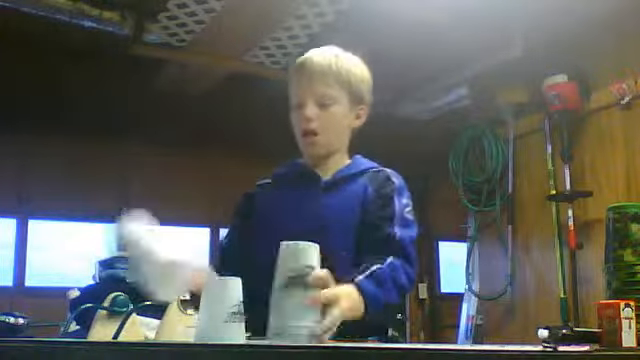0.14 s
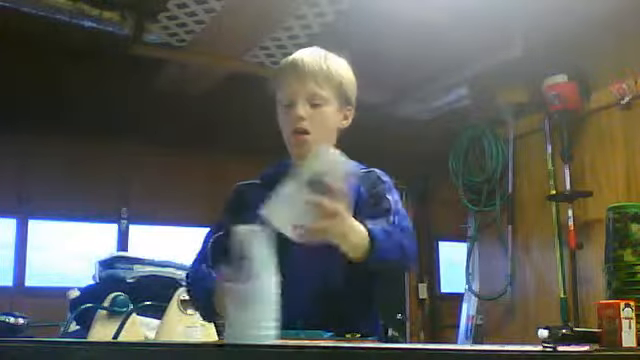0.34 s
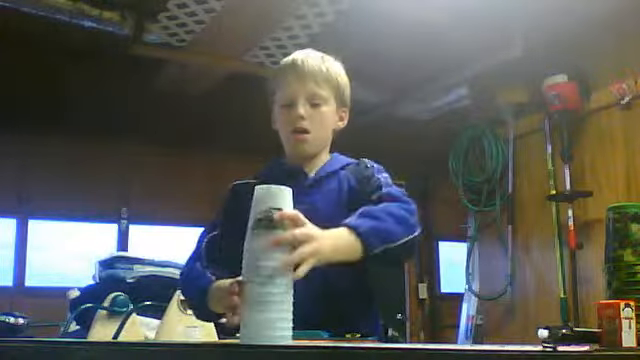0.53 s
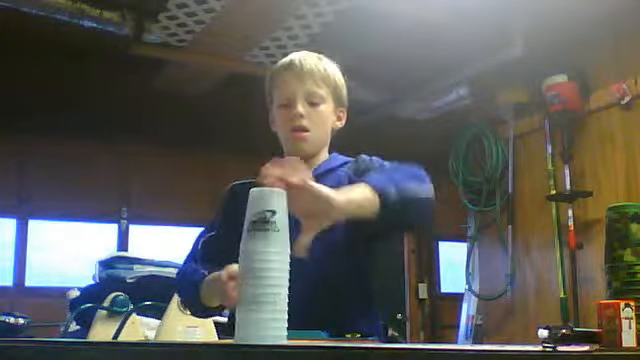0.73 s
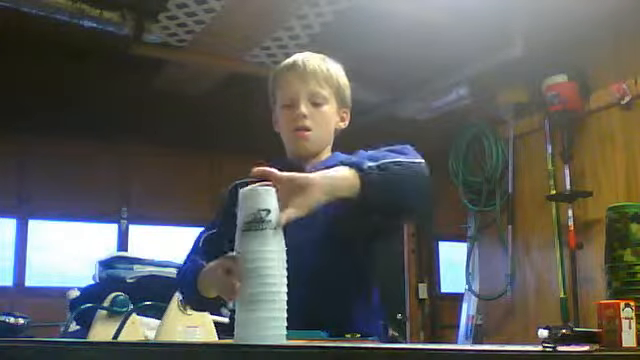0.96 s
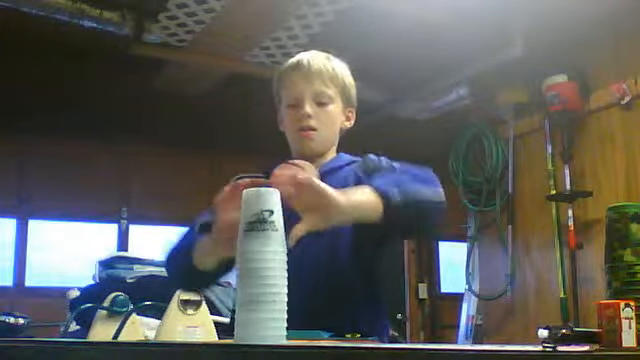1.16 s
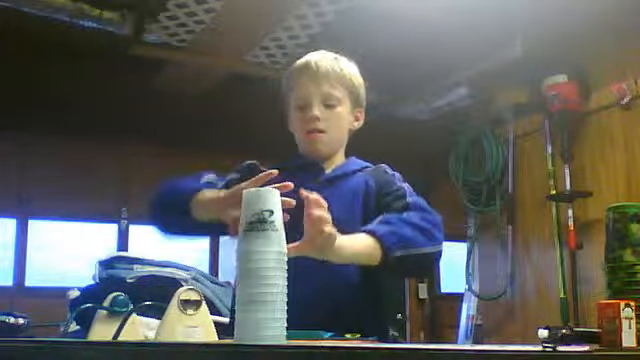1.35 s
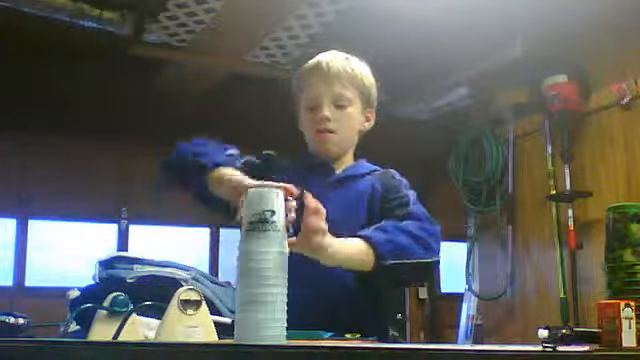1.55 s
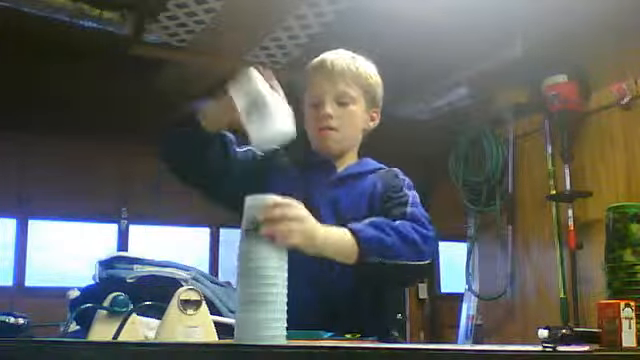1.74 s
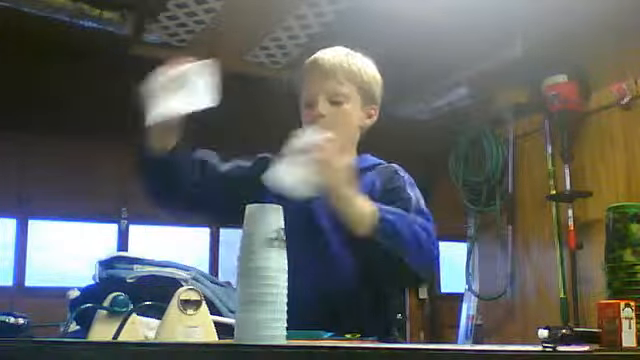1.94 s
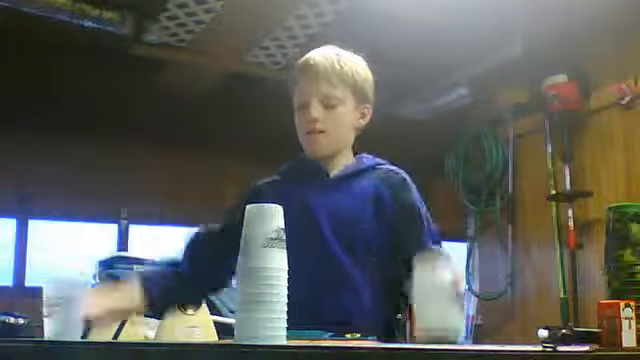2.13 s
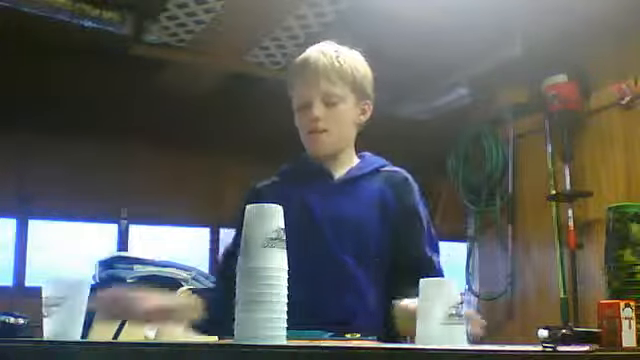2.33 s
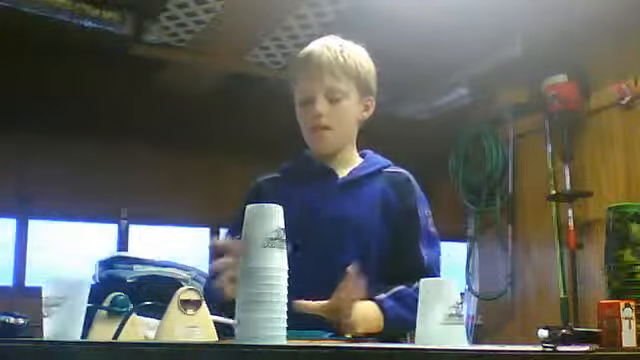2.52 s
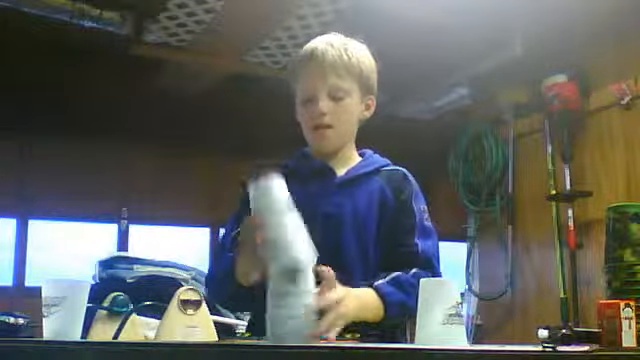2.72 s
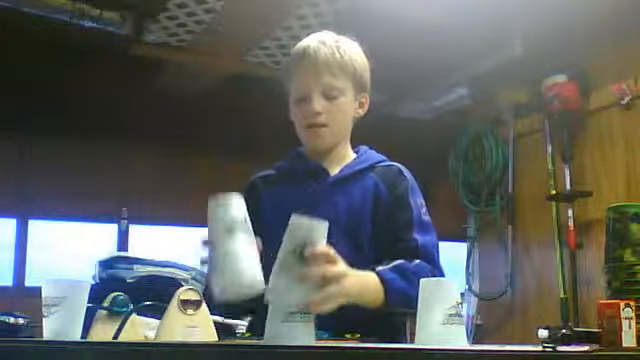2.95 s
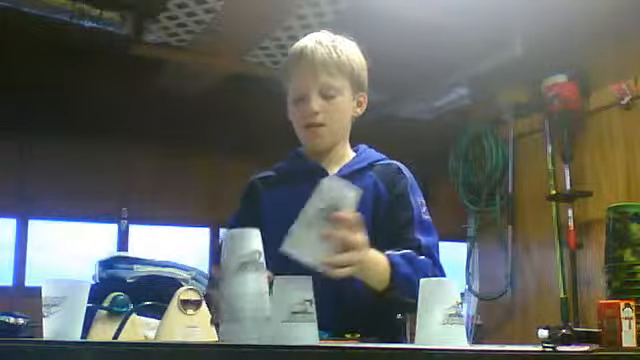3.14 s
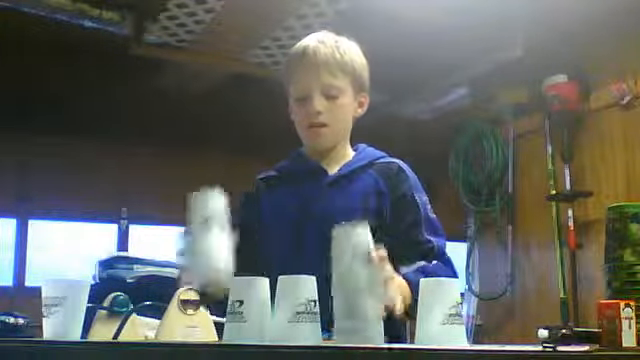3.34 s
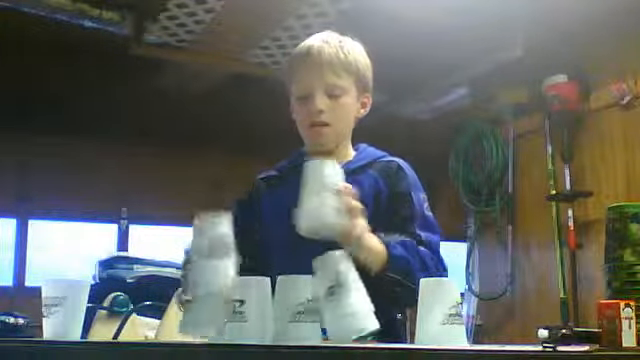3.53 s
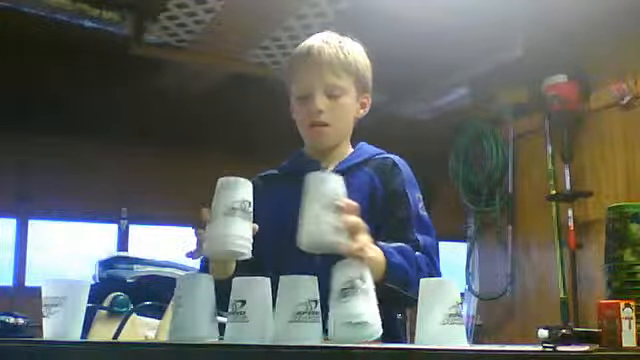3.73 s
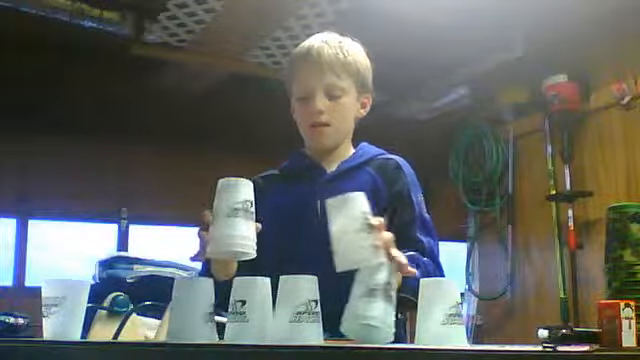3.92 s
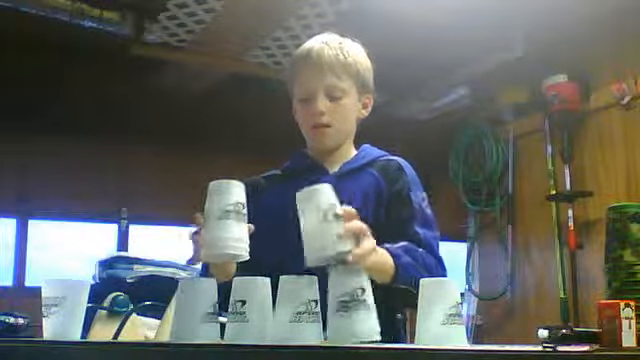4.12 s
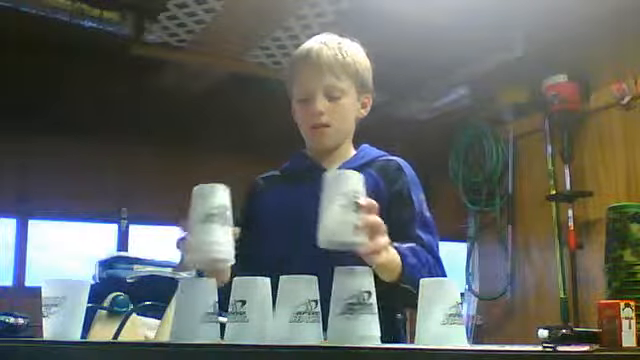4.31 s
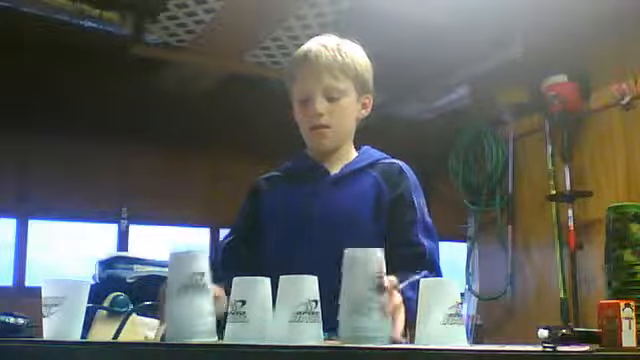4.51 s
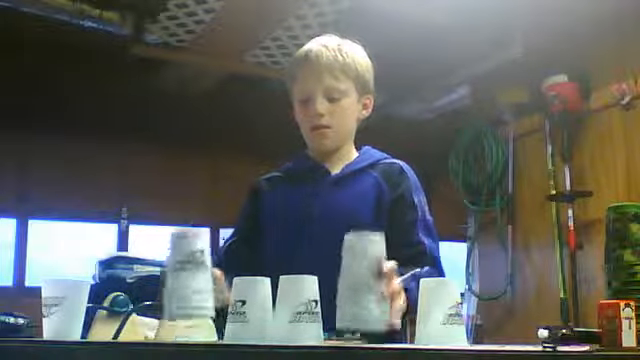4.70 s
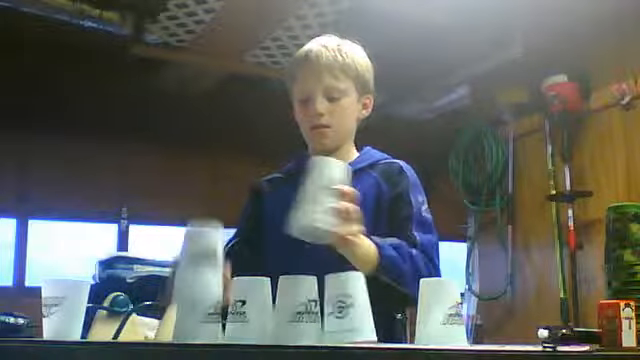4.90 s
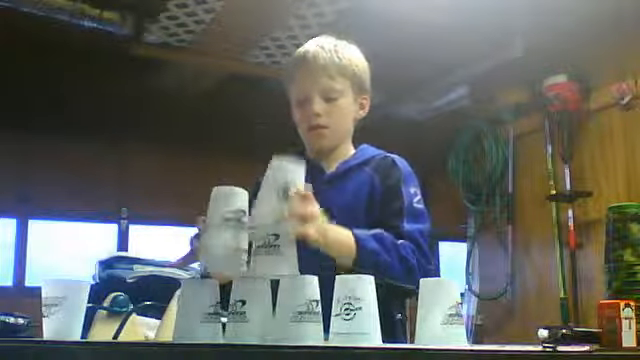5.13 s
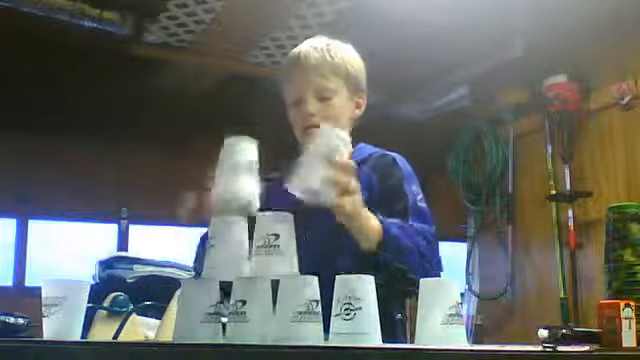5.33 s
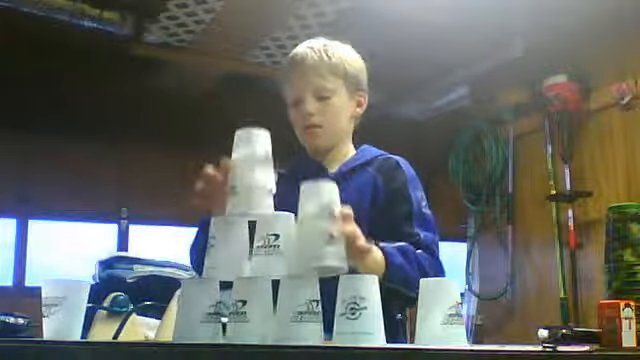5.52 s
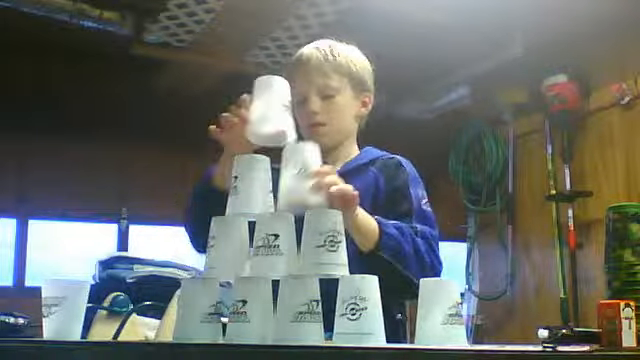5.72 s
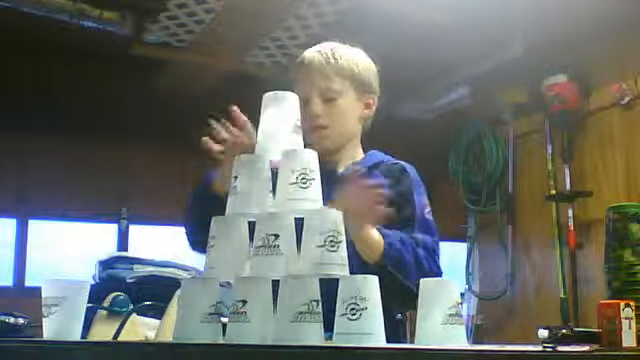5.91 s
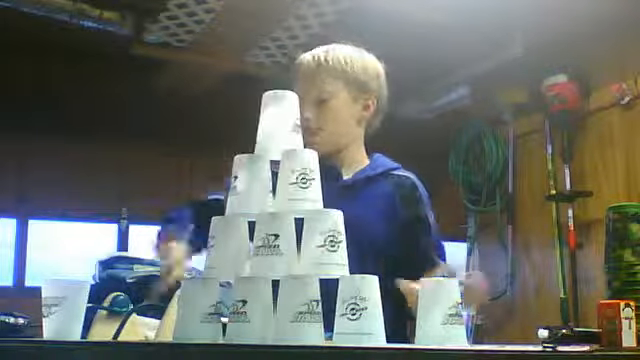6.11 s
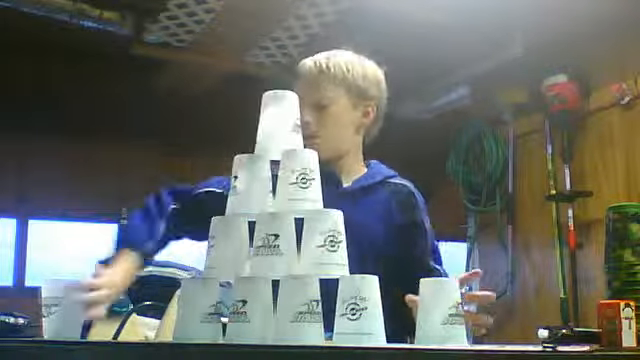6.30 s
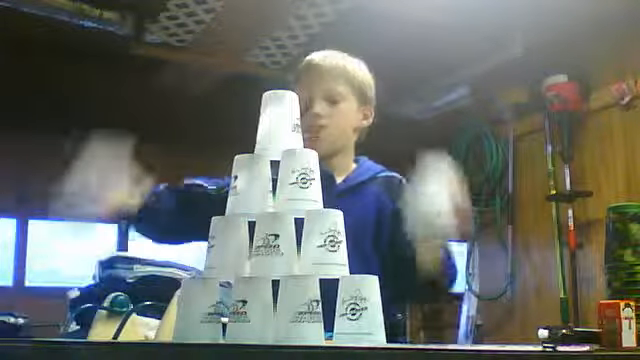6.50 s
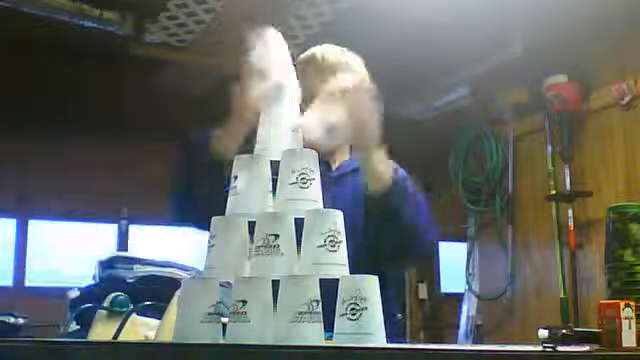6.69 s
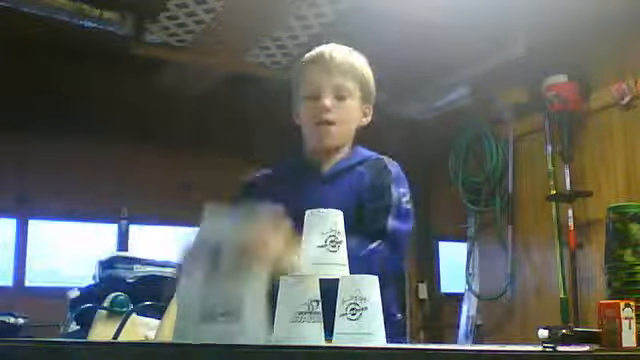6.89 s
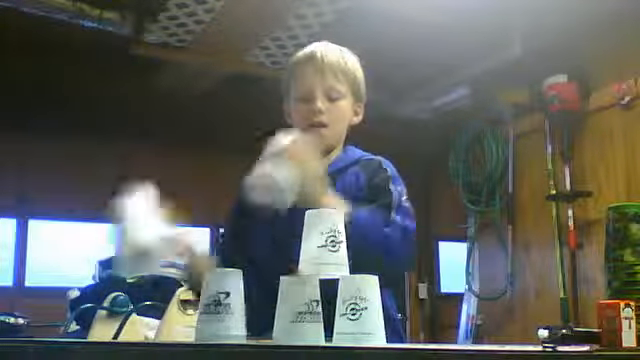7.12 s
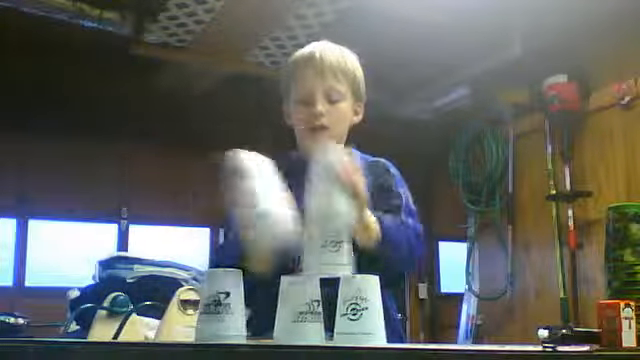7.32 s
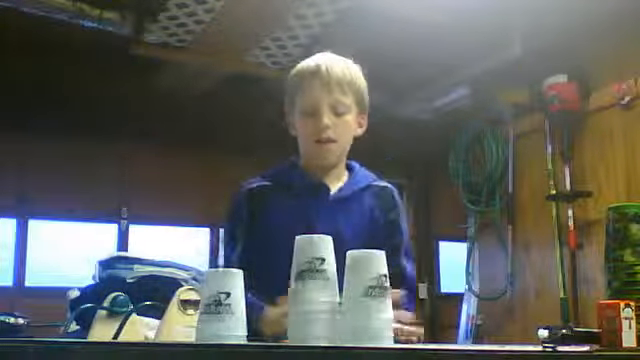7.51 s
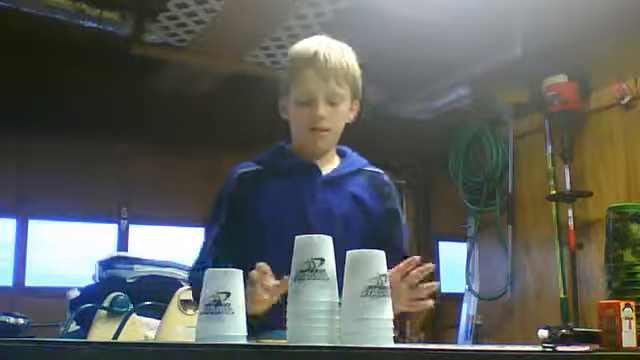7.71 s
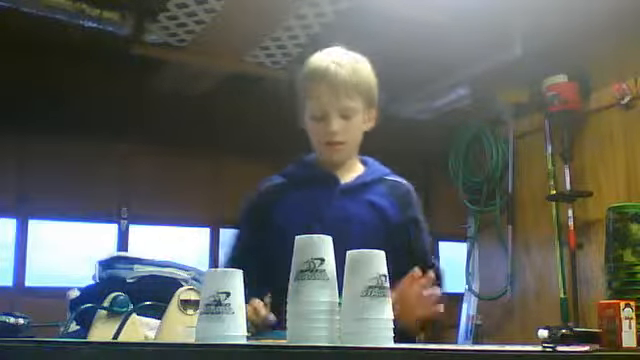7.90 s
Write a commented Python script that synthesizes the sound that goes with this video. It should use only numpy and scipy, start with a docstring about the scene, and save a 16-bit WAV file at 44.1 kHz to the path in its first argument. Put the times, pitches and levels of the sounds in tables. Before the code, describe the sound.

A low, steady electrical-mechanical hum throbs about eleven times a second under faint hiss throughout. From 0 to 0.7 s hollow plastic cups clack rapidly together and onto a tabletop, strong at first, then weaker. Only the hum remains until about 2.15 s, when three quick knocks land, the first sharp. Another gap lasts to 3 s. Uneven runs follow: soft ticks, then hollow clacks around 3.15 to 3.8 s, near silence until 4.4 s, light double knocks, and louder groups from 4.8 to 5.8 s, with hard, clipped hits near 5.45 and 5.8 s. After a lull with one barely audible tap, a dense clatter tumbles from 6.7 to 7.5 s, briefly parting around 7.1 s. Each hit is short, midrange and hollow, with a papery crunch and tiny rattle, and a faint small-shed echo. The close microphone is dull; background noise rises with the clatter. Hum alone ends it.

```python
"""Plastic cups are stacked into pyramids and swept down on a wooden table in a small shed, over a laptop's hum.
Blows crowd the first 0.7 s, three follow a pause at 2.2 s, runs come from 3 to 6 s, and a dense burst from 6.7 to 7.5 s.
Each contact excites the modes of the trapped air, cup and tabletop; the cup rebounds and rattles to rest, the shed echoes.
Disk and fan turn at nearby speeds and beat throughout; the laptop's noise gate opens with the clatter, and the
loudest blows clip."""
import sys
import numpy as np
from scipy import signal
from scipy.fft import rfft, irfft, next_fast_len
from scipy.io import wavfile
from scipy.ndimage import uniform_filter1d

SR = 44100
rng = np.random.default_rng(int(sys.argv[2]) if len(sys.argv) > 2 else 0)


def inscribe(sig):
    """Save sig as 16-bit PCM at rate SR to the path in sys.argv[1].

    A 1-D sig is mono; a 2-D sig holds one channel per row.
    Samples are clipped to [-1, 1] before scaling.
    """
    pcm = np.round(np.clip(np.atleast_2d(sig).T, -1, 1) * 32767)
    wavfile.write(sys.argv[1], SR, pcm.astype(np.int16))


N = 350579

T = np.arange(SR // 5) / SR  # time since first touch [s]
BRIEF = T[:SR // 20]  # all the cup's own ringing is over by its end
CREST_DB = 5.5  # peak of a ringing part over its rms
CRUNCH_PEAK_S, CRUNCH_WIDTH_S = .0035, .0026  # the crunch swells just after first touch


def amp(db):
    """Level to amplitude ratio: 20 dB is a factor of ten."""
    return 10 ** (np.asarray(db) / 20)


def unit(x):
    """Normalisation by the root mean square: x at rms 1."""
    return x / np.sqrt(np.mean(x ** 2) + 1e-20)


def along(points, hz):
    """Interpolation of (frequency [Hz], value) points on a logarithmic frequency axis."""
    f, value = np.transpose(points)
    return np.interp(np.log(hz + 1), np.log(f + 1), value)


def filtered(x, response):
    """Linear filtering: the spectrum of x times a response of frequency."""
    m = next_fast_len(N + SR // 2)
    spectrum = rfft(x, m) * response(np.fft.rfftfreq(m, 1 / SR))
    return irfft(spectrum, m)[..., :N]


def cups():
    """Superposition of contacts: each sums the hollow cup, its thin plastic and the tabletop."""
    # the contacts: (time [s], peak of the struck hollow part [dB], trapped air [Hz], base [Hz],
    # rms of base, table, wall and rim under that peak [dB], rattle [dB], rattle length [s])
    blows = [(0.0, -6, 581, 835, -11, -15.5, -17, -32, -22, 0.067),
             (0.008, -4.5, 568, 875, -4, -18.5, -16, -28.5, -17, 0.12),
             (0.063, -7, 630, 957, -8.5, -26.5, -8, -22, -23, 0.12),
             (0.151, -15.5, 652, 966, -8, -3.5, -3.5, -11, -22, 0.065),
             (0.165, -14, 605, 1172, -7.5, -9, -9, -23, -15.5, 0.11),
             (0.233, -14.5, 489, 1185, -16.5, -33, -28.5, -28.5, -22, 0.27),
             (0.273, -25, 388, 753, -14, -7.5, -16, -19, -17, 0.051),
             (0.393, -11.5, 577, 907, -7, -9, -23, -35.5, -15.5, 0.09),
             (0.499, -21.5, 563, 900, -22, -15, -33, -30, -16.5, 0.071),
             (0.719, -24.5, 506, 950, -6.5, -7, -21, -50, -18, 0.035),
             (2.15, -2.5, 742, 950, -6.5, -20.5, -38.5, -49, -13.5, 0.09),
             (2.171, -8, 673, 914, -5, -23.5, -36.5, -64, -27.5, 0.065),
             (2.205, -16, 647, 910, -4, -15, -8.5, -11.5, -25, 0.03),
             (3.004, -35.5, 436, 1160, -23, -8.5, -31, -31, -12, 0.079),
             (3.011, -35.5, 468, 1140, -13, -8.5, -8, -10, -26.5, 0.056),
             (3.153, -12.5, 500, 890, -13, -21, -21, -31.5, -19.5, 0.086),
             (3.333, -9.5, 585, 1000, -17, -17.5, -19.5, -27, -21, 0.096),
             (3.401, -23.5, 502, 813, -9, -15, -32.5, -33, -18, 0.081),
             (3.45, -11, 613, 820, -12, -20.5, -36.5, -38, -16.5, 0.11),
             (3.457, -12, 571, 917, -8, -13.5, -19.5, -19, -19, 0.064),
             (3.537, -22.5, 766, 820, -9, -17.5, -9.5, -26, -14, 0.071),
             (3.595, -25, 560, 776, -26, -13.5, -21, -40, -17.5, 0.068),
             (3.781, -22, 759, 830, -4, -32.5, -22, -52, -23.5, 0.11),
             (3.95, -34, 557, 1270, -30, -15.5, -20, -34, -20, 0.09),
             (3.993, -30.5, 564, 837, -30, -15.5, -37, -37, -18.5, 0.08),
             (4.402, -36.5, 759, 810, 6, -24, -22, -37.5, -14, 0.09),
             (4.424, -26, 506, 814, -7, -17, -38, -31, -11, 0.17),
             (4.484, -17.5, 588, 1093, -8, -15, -11, -28.5, -19.5, 0.13),
             (4.502, -17, 676, 1120, -4.5, -19, -12.5, -34, -19, 0.12),
             (4.801, -32, 478, 732, -5, 2, -26.5, -39.5, -9, 0.15),
             (4.834, -12.5, 533, 820, -17.5, -16.5, -29, -36, -17.5, 0.1),
             (4.976, -29, 517, 999, -36, -7, -26.5, -39, -19, 0.1),
             (5.075, -4, 589, 848, -19, -27.5, -24, -22.5, -20, 0.11),
             (5.108, -11.5, 528, 1120, -7.5, -24.5, -22, -35.5, -20, 0.09),
             (5.166, -8, 518, 875, -9.5, -30, -19.5, -26.5, -18.5, 0.073),
             (5.209, -16, 532.5, 1157, -9.5, -27.5, -28.5, -56, -17.5, 0.09),
             (5.463, 2, 632, 879, -10.5, -23.5, -16.5, -25, -18, 0.08),
             (5.525, -11, 507.4, 840, -10.5, -20, -20, -46, -16, 0.072),
             (5.544, -20.5, 694, 862, -4, -26, -44, -46, -20, 0.097),
             (5.596, -38, 780, 838, -13, -23.5, -24.5, -40.5, -15.5, 0.075),
             (5.746, -11, 473, 1049, -9.5, -23, -27, -39.5, -13, 0.078),
             (5.766, -8.5, 568, 1002, -3, -33, -15, -19.5, -27, 0.055),
             (5.79, 3.5, 477, 843, -1, -29.5, -18, -26.5, -19, 0.058),
             (5.839, -12.5, 527, 1020, -4, -33.5, -23, -57, -20.5, 0.081),
             (6.339, -41.5, 471, 880, -30, -20.5, -9, -30, -18.5, 0.09),
             (6.686, -20, 696, 780, -4, -31, -22, -26, -11.5, 0.09),
             (6.691, -9, 524, 940, -5, -43.5, -18, -25.5, -19.5, 0.12),
             (6.719, -6, 439, 888, -6, -31.5, -21.5, -28.5, -16, 0.06),
             (6.774, -12, 473, 1010, -8.5, -23, -10.5, -20.5, -14.5, 0.098),
             (6.823, -13, 782, 741, -2, -28.5, -12, -21.5, -15.5, 0.09),
             (6.848, -2, 505, 1024, -7, -26.5, -3.5, -18, -22, 0.084),
             (6.9, -9, 587, 847, -13.5, -39.5, -20.5, -26, -20.5, 0.09),
             (6.923, -11, 505, 887, -5, -22, -10.5, -24, -14.5, 0.13),
             (6.972, -7.5, 602, 1057, -7.5, -10, -8.5, -24, -18.5, 0.097),
             (6.994, -10, 490, 1263, -7, -8, -18, -41, -18, 0.11),
             (7.271, -2, 501, 1008, -7, -23, -18.5, -23, -22, 0.078),
             (7.294, -11.5, 583, 970, -19, -19.5, -15, -44.5, -24.5, 0.11),
             (7.338, -11, 500, 880, -2, -32.5, -20.5, -25.5, -12, 0.09),
             (7.367, -13.5, 562, 904, -9.5, -13, -4, -24, -20, 0.12),
             (7.406, -3.5, 471, 980, -9, -8, -14, -20, -18.5, 0.11),
             (7.429, -14.5, 417, 1286, -6, -1.5, -11.5, -42, -19, 0.06),
             (7.467, -20, 407, 1220, -1, -1.5, -8, -33, -16, 0.14)]
    # tabletop modes: (frequency [Hz], relative level [dB], t60 [s])
    tabletop = [(122.4, -4.5, .08), (188.4, -3, .1), (232.5, -3, 0.08), (356.3, -6.5, 0.068)]
    out = np.zeros(N + SR)
    for s, db, air_hz, base_hz, base_db, table_db, wall_db, rim_db, rattle_db, length in blows:
        luck = rng.standard_normal((7, 14))  # one row for each set of modes, the last for the rebounds
        pushes, taps, fade_db = contact(length, rattle_db, luck[6])
        sound = hollow_cup(db, air_hz, base_hz, base_db, pushes, taps, luck)
        sound += thin_plastic(table_db, wall_db, rim_db, rattle_db, pushes, fade_db, luck)
        table = ring(tabletop, T, luck[3], attack=.0021, stray=.038)
        sound[:len(T)] += amp(table_db + CREST_DB) * table
        out[round(s * SR):][:len(sound)] += amp(db) * sound
    return out[:N]


def contact(length, rattle_db, luck):
    """Repeated impact with energy loss: touch, far edge, weakening rebounds and a fading random rattle."""
    far_edge_s, far_edge_db = .006022, -12  # a cup lands tilted: its far edge follows
    rebound_s, rebound_loss_db = .019, 16.5  # then it rebounds at this pace, weaker each time
    fall_db, bend = 30, 1.93  # fall over one rattle length; slow at first, then steep
    taps_per_s = 1500  # the loose rattle under the rebounds
    fade_db = -fall_db * (T / length) ** bend
    pushes = np.zeros(len(T))
    pushes[0] = 1
    pushes[round(far_edge_s * SR)] = amp(far_edge_db)
    for n in range(1, 5):
        delay = n * rebound_s * (1 + .05 * luck[n])
        pushes[round(delay * SR)] = amp(-n * rebound_loss_db)
    pushes *= amp(fade_db)
    touching = rng.random(len(T)) < taps_per_s / SR
    strength = 2 * rng.random(len(T)) - 1
    taps = touching * strength * amp(rattle_db + fade_db)
    return pushes, taps, fade_db


def hollow_cup(db, air_hz, base_hz, base_db, pushes, taps, luck):
    """Impulse response of the low modes, convolved with the clean pushes and the uneven taps."""
    # cup modes, struck by every contact: (frequency [Hz], relative level [dB], t60 [s])
    body_modes = [(490.6, -2.5, 0.029), (596.3, 0.5, 0.023), (822.6, -1.5, 0.041), (970.4, -5.5, 0.043),
                  (1301, -17, 0.065)]
    # modes of a cup that no hand damps: (frequency [Hz], relative level [dB], t60 [s])
    loose_modes = [(1110, -1, .025), (1289, 0, 0.02)]
    body_db, body_grows = -6, .28  # body under air and base; dB gained for each dB of blow
    steady = np.zeros(1)
    base = min(amp(base_db + CREST_DB), .98)
    air = np.sqrt(1 - base ** 2)  # the air takes the energy that the base leaves
    hollow = air * ring([(air_hz, 0, .022)], BRIEF, steady, attack=.0016, stray=0)
    hollow += base * ring([(base_hz, 0, .022)], BRIEF, steady, attack=.0027, stray=0)

    body = ring(body_modes, BRIEF, luck[0], attack=.0032, stray=.048)
    struck = signal.fftconvolve(hollow + amp(body_db + body_grows * db) * body, pushes)
    struck /= np.abs(struck).max()

    rattling_body = ring(body_modes, BRIEF, luck[5], attack=.0013, stray=.058)
    loose = ring(loose_modes, BRIEF, luck[5, 5:9], attack=.0013, stray=.052)
    rattle = signal.fftconvolve(hollow + amp(-1) * rattling_body + amp(-12) * loose, taps)
    return struck + rattle


def thin_plastic(table_db, wall_db, rim_db, rattle_db, pushes, fade_db, luck):
    """Friction excitation: rough contact drives skirt, wall and rim by a crunch, then by sliding."""
    # modes of the open end, the wall and the rim: (frequency [Hz], relative level [dB], t60 [s])
    skirt = [(1320, -1.8, 0.0056), (1528, 0.33, 0.01), (1810, -2.6, 0.0076)]
    wall = [(1980, -6, 0.0031), (2356, -1.5, 0.0087), (2510, -17.5, 0.021), (2870, -17, 0.02)]
    rim = [(3330, -3, 0.0052), (3937, 0.5, 0.012), (4370, 4, 0.0045), (4890, 0.5, 0.0027), (5400, -2, .003),
           (6150, -4, .003), (7970, -34.5, .003)]
    crunch_db = -7  # drive of skirt, wall and rim against their rms settings
    swell = np.exp(-((BRIEF - CRUNCH_PEAK_S) / CRUNCH_WIDTH_S) ** 2)
    crunch = signal.fftconvolve(swell, pushes)[:len(T)]
    slide_onset = 1 - np.exp(-T / CRUNCH_PEAK_S)
    # the open end flexes more as it meets the table
    skirt_db = wall_db + 1.5 + .28 * np.clip(table_db + 21.5, -20, 10)
    # (modes, level [dB], sliding over rattle [dB], haste of its fade, luck): it dies sooner higher up
    parts = ((skirt, skirt_db, 10, .8, luck[4]),
             (wall, wall_db, 8, 1.05, luck[1]),
             (rim, rim_db, 11, 1.2, luck[2]))
    sound = 0
    for modes, level_db, slide_db, haste, part_luck in parts:
        bell = ring(modes, BRIEF, part_luck, attack=.00022, stray=.029)
        bell /= np.linalg.norm(bell)
        slide = amp(rattle_db + haste * fade_db + slide_db) * slide_onset
        rough = rng.standard_normal(len(T)) * (crunch + slide)
        sound = sound + amp(level_db + crunch_db) * signal.fftconvolve(bell, rough)
    return sound


def ring(modes, t, luck, attack, stray):
    """Modal superposition: decaying sines of uneven strength, pitches astray by a small share, peak 1."""
    hz, db, t60 = np.transpose(modes)[:, :, None]
    k = len(modes)
    tones = np.sin(2 * np.pi * hz * (1 + stray * luck[:k, None]) * t)
    decay = amp(db + 2 * luck[-k:, None] - 60 * t / t60)
    sound = np.sum(decay * tones, axis=0) * (1 - np.exp(-t / attack))
    return sound / np.abs(sound).max()


def shed(x):
    """Reverberation: the walls answer with noise whose frequencies each decay at their own t60."""
    # decay of the shed: (frequency [Hz], t60 [s])
    decay_times = [(150, 0.37), (700, 0.33), (2000, 0.35), (5000, 0.3), (10000, 0.041)]
    out, step = np.zeros(N + SR), SR // 4
    for start in range(0, N, step):  # fresh random echo noise each quarter second
        hz, t, z = signal.stft(rng.standard_normal(SR // 3), SR, nperseg=256)
        decay_db = -60 * t / along(decay_times, hz)[:, None]
        treble_loss_db = .55 * hz[:, None] / 1000
        tail = signal.istft(z * amp(decay_db - treble_loss_db), SR, nperseg=256)[1]
        wet = signal.fftconvolve(x[start:start + step], tail / np.linalg.norm(tail))
        out[start + 300:][:len(wet)] += wet  # the echo starts 300 samples late
    return out[:N]


def laptop():
    """Rotating unbalance and filtered noise: disk and fan tones beat under a steady hiss of cooling air."""
    # fan speed: (time [s], speed [turns/s])
    fan_speed = [(0, 78.77), (1.5, 78.79), (2.4, 78.83), (3.5, 78.79), (5.2, 78.845), (7, 78.885),
                 (8, 78.9)]
    # fan tones: {multiple of the speed: level [dB rms]}
    fan_tones = {1: -46.5, 2: -55.5, 3: -57.5, 4: -60.5, 5: -71, 8: -68.5, 12: -67.5, 13: -64.5, 16: -62.5,
                 17: -62.5, 18: -66, 20: -64.5, 26: -65.5}
    # response that shapes the steady hiss, with a steep drop above 7 kHz:
    # (frequency [Hz], relative level [dB])
    hiss_response = [(20, -11.5), (35, -1), (60, -20), (130, -15), (210, -11.5), (360, -17), (1000, -16),
                     (1400, -12.5), (1760, -16.5), (2700, -21.5), (3300, -28.5), (3930, -39.5),
                     (7000, -45.5), (7500, -58), (15000, -85)]
    disk_hz, disk_db, hiss_db = 89.991, -41, -49  # levels in dB rms
    in_step_s = .0125  # disk and fan first swing together here
    t = np.arange(N) / SR
    turns = np.cumsum(np.interp(t, *np.transpose(fan_speed))) / SR
    turns -= np.interp(in_step_s, t, turns)
    hum = amp(disk_db) * np.cos(2 * np.pi * disk_hz * (t - in_step_s))
    for order, db in fan_tones.items():
        phase = (order > 1) * rng.uniform(0, 2 * np.pi)
        hum += amp(db) * np.cos(order * 2 * np.pi * turns + phase)

    # the noise wavers by about 1 dB in patches of time and frequency
    z = signal.stft(rng.standard_normal(N + SR), nperseg=512)[2]
    patches = uniform_filter1d(rng.standard_normal(z.shape), 6, 0)
    patches_db = unit(uniform_filter1d(patches, 10, 1))
    noise = signal.istft(z * amp(patches_db), nperseg=512)[1][:N]
    hiss = unit(filtered(noise, lambda hz: amp(along(hiss_response, hz))))
    return np.sqrt(2) * hum + amp(hiss_db) * hiss  # root 2: a sine's peak over its rms


def microphone(x, low_hz, high_hz):
    """Band-pass response: the small capsule loses deep bass and, steeply, high treble."""
    x = signal.sosfilt(signal.butter(2, low_hz, "highpass", fs=SR, output="sos"), x)
    return signal.sosfilt(signal.butter(4, high_hz, fs=SR, output="sos"), x)


def gate(x, shut_db, open_db, window):
    """Downward expansion: everything is turned down while the sound above the hum stays weak."""
    depth_db = 8.5  # how far quiet moments are turned down
    heard = filtered(x, lambda hz: hz > 400)
    power = np.abs(uniform_filter1d(heard ** 2, round(window * SR)))
    level_db = 10 * np.log10(power + 1e-12)
    openness = np.clip((level_db - shut_db) / (open_db - shut_db), 0, 1)
    openness = uniform_filter1d(openness, round(.0087 * SR))
    return x * amp(-depth_db * (1 - openness))


def scene():
    """Two paths of transmission: cups and echo reach the capsule by air, the hum through the case."""
    clacks = cups()
    airborne = clacks + amp(-18) * shed(clacks)
    return (microphone(airborne, low_hz=90, high_hz=8360) + laptop())[None]


def record(dry):
    """Nonlinear saturation after a noise gate, then a dull converter and the band limit."""
    top, top_hz = .71, 15800  # the input's ceiling and the highest frequency kept [Hz]
    gated = gate(dry, shut_db=-44, open_db=-30.5, window=.014)
    clipped = gated / (1 + np.abs(gated / top) ** 10) ** (1 / 10)
    return filtered(clipped, lambda hz: (hz < top_hz) / np.sqrt(1 + (hz / 11000) ** 4))


dry = scene()
out = record(dry)
inscribe(out)
```